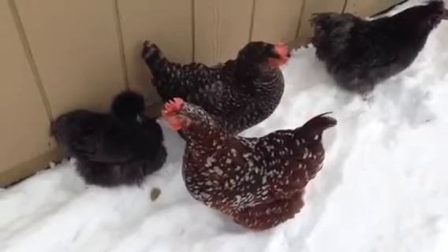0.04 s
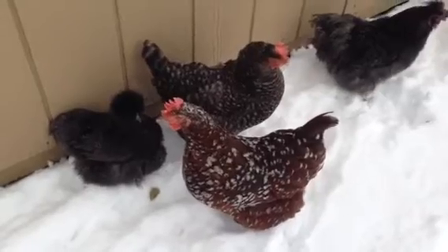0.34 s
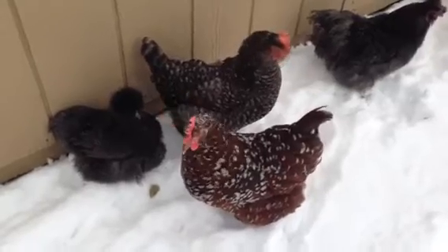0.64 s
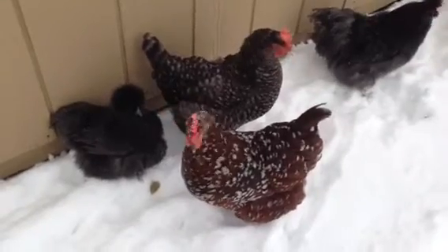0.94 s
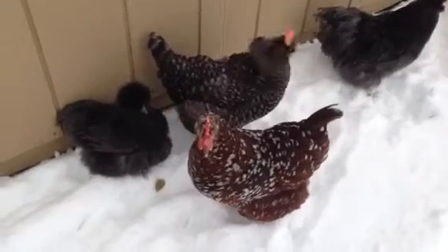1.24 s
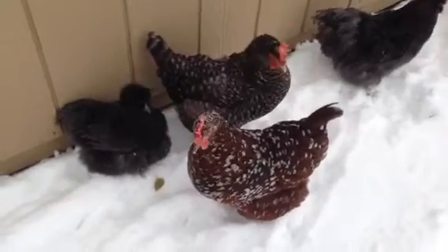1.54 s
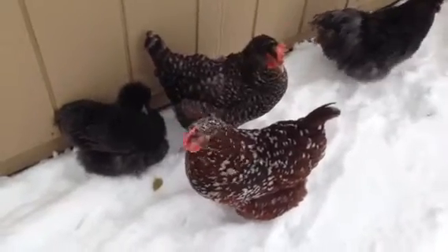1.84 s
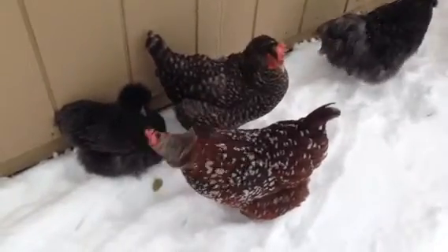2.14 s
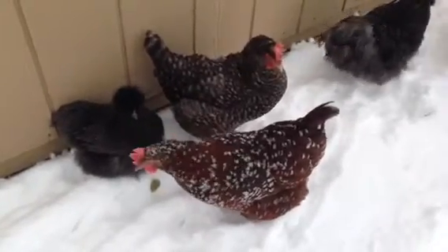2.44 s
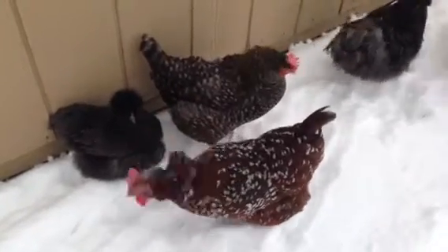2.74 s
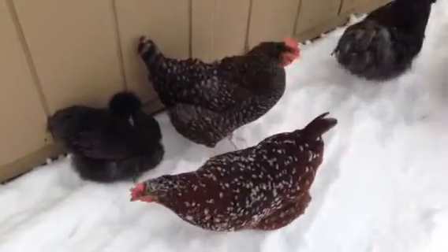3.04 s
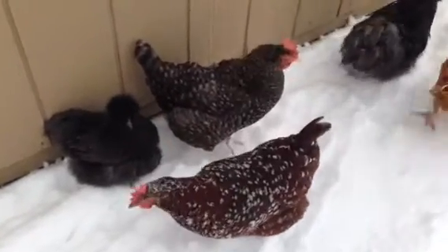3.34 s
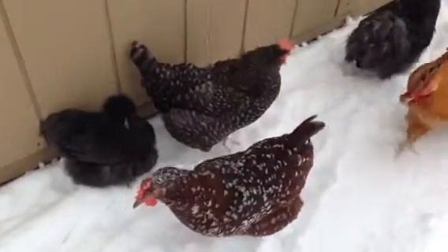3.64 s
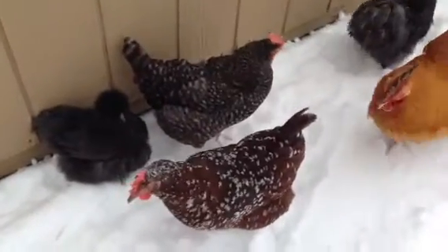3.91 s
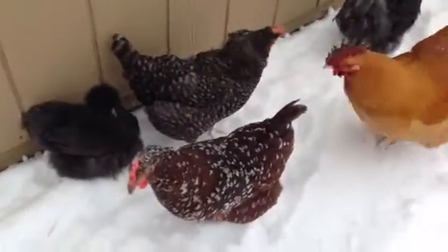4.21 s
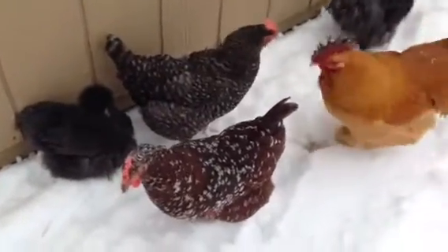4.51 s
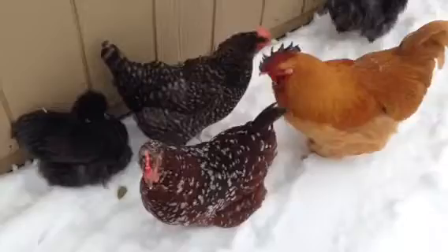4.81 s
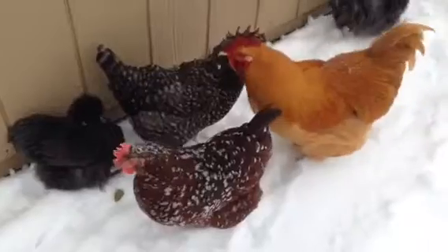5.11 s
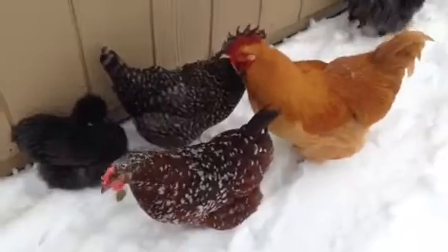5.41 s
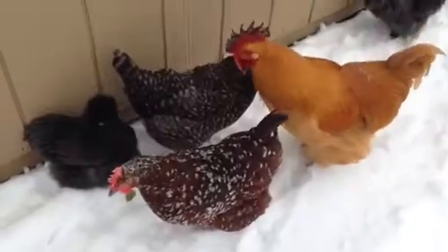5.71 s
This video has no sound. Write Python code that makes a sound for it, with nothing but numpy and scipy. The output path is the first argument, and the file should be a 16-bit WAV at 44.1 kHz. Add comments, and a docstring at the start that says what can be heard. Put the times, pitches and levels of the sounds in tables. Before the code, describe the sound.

A hen clucks, moans creakily and breaks into high rasping whines, twice over, close by in a quiet outdoor yard.

```python
"""A snowy yard by a shed wall, chickens close to the microphone. Twice a hen clucks, moans low and creaky,
then breaks into a high rasping whine with short squawks after it. Her voice is syrinx pulses and breath
shaped by throat and beak; membranes slapping shut make the rattle. Another bird murmurs, the flock
whistles thinly, a small bird chips and beaks tick. A hollow rush swells in the quiet air and a puff of
wind bumps the microphone."""
import sys
import numpy as np
from scipy import signal
from scipy.fft import rfft, irfft, next_fast_len
from scipy.io import wavfile
from scipy.ndimage import uniform_filter1d

SR = 44100
rng = np.random.default_rng(int(sys.argv[2]) if len(sys.argv) > 2 else 0)


def generate_wav(sig):
    """Save sig (samples, or channels by samples) to the path in sys.argv[1] as 16-bit PCM at SR."""
    pcm = np.round(np.clip(np.atleast_2d(sig).T, -1, 1) * 32767).astype(np.int16)
    wavfile.write(sys.argv[1], SR, pcm)


N = 258426
T = np.arange(N) / SR

# Upper resonances of windpipe and beak in moans and murmurs. Each row: frequency in Hz, gain in dB.
LOW_VOICE_EDGE = [(2000, -4), (2400, -3), (2850, -14.5), (3300, -10), (3620, 1), (4000, -18), (4600, -13.5),
                  (5400, -25), (6400, -18.5), (7400, -28), (8700, -25), (14000, -57)]


def undb(db):
    """Decibels to gain."""
    return 10 ** (np.asarray(db) / 20)


def unit(x):
    """Scale to rms 1."""
    return x / np.sqrt(np.mean(x ** 2) + 1e-18)


def steady(x, size=480):
    """Hold the short-term rms at 1."""
    power = uniform_filter1d(uniform_filter1d(x ** 2, size), size)
    return x / np.sqrt(np.abs(power) + 1e-12)


def band(x, lo_hz, hi_hz, order=2):
    """Zero-phase band-pass."""
    sos = signal.butter(order, [lo_hz, hi_hz], "band", fs=SR, output="sos")
    return signal.sosfiltfilt(sos, x)


def colour(x, points, size=2048):
    """Minimum-phase filter through (Hz, dB) points."""
    hz, db = np.transpose(points)
    grid_hz = np.maximum(np.arange(size // 2 + 1) * SR / size, 1)
    cepstrum = irfft(np.log(undb(np.interp(np.log(grid_hz), np.log(hz), db))))
    cepstrum[1:size // 2] *= 2
    cepstrum[size // 2 + 1:] = 0
    return signal.fftconvolve(x, irfft(np.exp(rfft(cepstrum))))[:len(x)]


def wobble(n, lo_hz, hi_hz):
    """Random motion of rms 1 between two rates."""
    size = next_fast_len(n)
    hz = np.arange(size // 2 + 1) * SR / size + 1e-3
    spectrum = rfft(rng.standard_normal(size)) / (1 + (hz / hi_hz) ** 4) / (1 + (lo_hz / hz) ** 4)
    return unit(irfft(spectrum, size))[:n]


def gate(t, start, end, edge_s):
    """Soft-edged window from start to end."""
    return np.sin(np.pi / 2 * np.clip(np.minimum(t - start, end - t) / edge_s + .5, 0, 1)) ** 2


def ramp(t, start, end):
    """Progress from 0 to 1."""
    return np.clip((t - start) / (end - start), 0, 1)


def burst(t, half_s):
    """Flat-topped bump of height 1 around time 0."""
    return np.exp(-np.square(np.square(t / half_s)))


def around(start, end):
    """Sample mask of a call, with a margin."""
    return (T > start - .03) & (T < end + .03)


def place(x, start):
    """Put a short sound on the timeline."""
    return np.interp(T - start, T[:len(x)], x, 0, 0)


def phase_of(hz):
    """Running phase in radians."""
    return 2 * np.pi * np.cumsum(hz) / SR


def pulses(phase, harmonics):
    """One sharp pulse a cycle: equal harmonics summed in closed form."""
    return (np.sin((harmonics + .5) * phase) / (2 * np.sin(phase / 2)) - .5) / np.sqrt(harmonics / 2)


def yard(air_db=-65):
    """Quiet outdoor air and a hollow rush that swells between the calls."""
    # Each row: frequency in Hz, gain in dB.
    air_shape = [(15, -51.5), (25, -6.5), (90, -6), (879, -23), (1910, -20.5), (2130, -19), (2370, -21.5),
                 (3930, -23), (15000, -25.5)]
    rush_shape = [(100, -32.5), (220, -4), (330, -4.5), (480, 0), (640, -0.5), (850, -13), (1300, -13),
                  (1700, -19), (2400, -44.5), (3300, -22.5), (4500, -30.5), (9000, -46)]
    # Each row: time in seconds, level in dB.
    rush_levels = [(0, -73), (1.7, -68), (2.05, -58), (2.5, -57.5), (2.7, -57.5), (2.88, -53.5), (3.1, -57),
                   (3.33, -58.5), (3.42, -59.5), (3.8, -55.5), (5.86, -72)]
    air = unit(colour(rng.standard_normal(N), air_shape, size=8192))
    rush = unit(colour(rng.standard_normal(N), rush_shape))
    rush_db = np.interp(T, *np.transpose(rush_levels)) + 0.53 * wobble(N, 1.6, 22)
    return air * undb(air_db) + rush * undb(rush_db)


def wind():
    """Gusts of low eddies at the microphone, with a few soft bumps."""
    # Each row: frequency in Hz, gain in dB.
    eddy_shape = [(25, -32), (42, -6), (62, 7), (100, 3.5), (170, -4.5), (280, -22), (450, -28), (900, -33),
                  (3000, -54)]
    # Each row: centre in seconds, half length in seconds, level in dB.
    gusts = [(5.22, 0.12, -59), (5.337, 0.021, -46.5), (5.385, 0.018, -41.5), (5.509, 0.09, -40),
             (5.769, 0.035, -54)]
    # Each row: centre in seconds, frequency in Hz, peak in dB.
    bumps = [(3.198, 146, -51.5), (4.559, 82.5, -48.5), (5.337, 164, -36.5), (5.467, 244, -28.5),
             (5.512, 176, -33), (5.558, 185, -34.5)]
    strength = sum(undb(db) * np.exp(-np.abs((T - s) / half_s) ** 3) for s, half_s, db in gusts)
    eddies = unit(colour(rng.standard_normal(N), eddy_shape, size=8192))
    out = steady(eddies, size=1800) * strength
    for s, hz, peak_db in bumps:
        cycles = (T - s) * hz
        out -= undb(peak_db) * np.cos(2 * np.pi * cycles) * np.exp(-(cycles / 0.53) ** 2)
    return out


def chips(high_hz=8700, low_hz=7400, glide_s=0.0087):
    """A small bird's chips: a high tone slides down and levels off."""
    # Each row: start in seconds, peak in dB.
    notes = [(0.707, -63.5), (2.885, -66), (3.705, -65.5)]
    t = T[:SR // 20]
    hz = low_hz + (high_hz - low_hz) * np.exp(-t / glide_s)
    chip = np.sin(phase_of(hz)) * gate(t, 0.0012, 0.027, edge_s=0.0075)
    return sum(undb(db) * place(chip, start) for start, db in notes)


def ticks(decay_s=0.0017):
    """Beak ticks and snow crunches: tiny dry bursts of noise."""
    # Each row: start in seconds, peak in dB.
    contacts = [(1.798, -45), (2.282, -39), (2.795, -43.5), (2.852, -39), (2.899, -43.5), (3.526, -52.5),
                (4.56, -55)]
    # Each row: frequency in Hz, gain in dB.
    shape = [(200, -20), (1200, -10.5), (2400, -17.5), (3600, -19.5), (5500, -15.5), (8000, -25),
             (14000, -25)]
    t = T[:SR // 40]
    out = np.zeros(N)
    for start, db in contacts:
        tick = colour(rng.standard_normal(len(t)) * np.exp(-t / decay_s), shape)
        out += undb(db) * place(tick / np.abs(tick).max(), start)
    return out


def whistles(fade_db=-3.5):
    """Thin, wavering tones glide, swell and fade: mostly the flock's, with a short high one from the hen at
    4.84 s."""
    # Each row: start and end in seconds, first and last pitch in Hz, top level in dB, its place 0-1.
    notes = [(1.757, 1.798, 1074, 1130, -51, .15), (2.6, 3.368, 545, 431.4, -60, 0.54),
             (3.401, 3.483, 800, 493, -56, 1), (3.524, 3.608, 830, 487, -55.5, .8),
             (3.673, 3.694, 539, 570, -52, 0.4), (3.717, 3.738, 606, 590, -49, 0.4),
             (4.839, 4.854, 1006, 1050, -36.5, 0.6)]
    out, waver = np.zeros(N), wobble(N, 24, 150)
    for start, end, first_hz, last_hz, db, peak_at in notes:
        span = around(start, end)
        progress = ramp(T[span], start, end)
        hz = first_hz * (last_hz / first_hz) ** progress * (1 + .028 * waver[span])
        swell = undb(db + np.interp(progress, [0, np.clip(peak_at, .01, .99), 1], [fade_db, 0, fade_db]))
        out[span] += np.sqrt(2) * np.sin(phase_of(hz)) * swell * gate(T[span], start, end, .004)
    return out


def voice(calls, throat, edge_shape, jitter, shimmer, air, hiss, loose, edge_trim_db, waver, harmonics):
    """Syrinx pulses through the throat, alternately strong and weak; a second membrane beats on them."""
    out = np.zeros(N)
    shake, grit = wobble(N, 30, 260), wobble(N, 110, 620)
    tremor, drift = wobble(N, 18.1, 51), wobble(N, 1.28, 29)
    beak_hz, edge_hz = 820, 2250
    for start, end, hz, body_db, beak_db, edge_db, beat, rough in calls:
        span = around(start, end)
        t = T[span]
        phase = phase_of(hz * (1 + jitter * rough * shake[span] + waver * (rough + 0.35) * tremor[span]))
        membrane = np.cos(phase_of(hz * 0.66 * (1 + 0.049 * drift[span])))
        alternation = beat * np.cos(phase / 2 + 0.91)
        rasp = rough * (loose * membrane + shimmer * grit[span])
        flow = pulses(phase, harmonics)
        # Air escapes once a cycle.
        puffs = rng.standard_normal(len(t)) * (1 + np.cos(phase)) * (rough + .025)
        tone = colour((flow + air * puffs) * (1 + alternation + rasp), throat)
        # Sharp closure comes mostly on the strong cycles.
        buzz = colour((flow + hiss * puffs) * (1 + 2.6 * alternation + rasp), edge_shape)
        body = steady(band(tone, 120, beak_hz, order=6))
        # The open beak lets out the second resonance and the bright edge above it.
        beak = undb(beak_db) * steady(band(tone, beak_hz, edge_hz, order=5))
        edge = undb(edge_db + edge_trim_db) * steady(band(buzz, edge_hz, 15000, order=4))
        envelope = undb(body_db + 2.2 * rough * tremor[span]) * gate(t, start, end, .006)
        out[span] += (body + beak + edge) * envelope
    return out


def murmurs(beak_db=-15, edge_db=-25.5, beat=.07, rough=0.33):
    """Another bird's soft closed-beak notes, each gliding a little."""
    # Each row: start and end in seconds, first and last pitch in Hz, body level in dB.
    notes = [(5.219, 5.242, 350, 299, -44.5), (5.323, 5.343, 352.4, 319, -47),
             (5.428, 5.457, 353, 363, -48.5), (5.489, 5.522, 326, 303, -56.5),
             (5.529, 5.569, 323.4, 307, -55), (5.594, 5.83, 317, 304, -59.5)]
    # Each row: frequency in Hz, gain in dB.
    throat = [(100, -37), (320, -13), (650, 0), (950, -9.5), (1300, -12), (2000, -9.5)]
    calls = []
    for start, end, first_hz, last_hz, db in notes:
        hz = first_hz + (last_hz - first_hz) * ramp(T[around(start, end)], start, end)
        calls.append((start, end, hz, db, beak_db, edge_db, beat, rough))
    return voice(calls, throat, LOW_VOICE_EDGE, jitter=0.056, shimmer=0.6, air=0.73, hiss=6.8,
                 loose=0.23, edge_trim_db=1.0, waver=0.029, harmonics=24)


def clucks():
    """The hen's clucks: a handful of uneven, breathy pulses through the throat."""
    # Each row: start, length and rise in seconds, first and last pitch in Hz, level and fade in dB.
    notes = [(0.478, 0.029, 0.013, 201.6, 203.5, -30.5, 13.5), (0.631, 0.026, 0.0036, 231.4, 217, -36, 7),
             (3.605, .064, 0.0047, 207.2, 169.6, -31.5, 27), (4.965, 0.028, .001, 262, 232.6, -50, -5.5)]
    # Each row: frequency in Hz, gain in dB.
    throat = [(90, -18), (190, 2), (300, -11), (470, -10.5), (620, 3.5), (760, 5), (1020, -10.5),
              (1300, 0.5), (1580, -12), (1850, -11), (2300, -23), (3500, -20), (4800, -38), (12000, -49)]
    out = np.zeros(N)
    t = T[:SR // 8]
    for start, length_s, rise_s, first_hz, last_hz, db, fade_db in notes:
        hz = np.interp(t, [0, length_s], [first_hz, last_hz]) * (1 + .018 * wobble(len(t), 30, 200))
        phase = phase_of(hz) - np.pi / 2
        flow = pulses(phase, harmonics=50) + rng.standard_normal(len(t)) * (1 + np.cos(phase))
        effort = np.minimum(t / rise_s, 1) * undb(-fade_db * t / length_s) * gate(t, -1, length_s, 0.012)
        cluck = colour(flow * effort, throat) / np.std(colour(flow, throat))
        out += undb(db) * place(cluck, start)
    return out


def moans(closing_db=6, beat=0.14):
    """The hen's low register: each glide starts creaky and clears as the beak closes."""
    # Each row: start and end in seconds, first and last pitch in Hz, body level, swell, beak resonance
    # and bright edge in dB, roughness 0-1, clearing time in seconds.
    notes = [(0.664, 0.732, 239, 245.4, -49, -1, -8.5, -38, 0.43, 0.087),
             (0.729, 1.084, 253.6, 327.3, -41, 7.5, -6, -23, 0.54, 0.14),
             (1.804, 1.834, 298.3, 329, -37, 7, -3, -20, 0.6, .1),
             (2.294, 2.332, 335, 344.6, -43, 8, 5, -20, 0.88, .1),
             (3.755, 3.818, 229.8, 202, -43.5, -6, -4, -23, 0.56, .2),
             (3.826, 3.883, 204.3, 215.3, -44, 12, -1.5, -22, 0.62, .2),
             (3.886, 4.054, 285.4, 318, -40.5, 4, -5.5, -25, 0.56, 0.086)]
    # Each row: frequency in Hz, gain in dB.
    throat = [(100, -35.5), (200, 0.5), (310, 1.5), (420, -2.5), (620, 12), (760, 6), (930, -13), (1080, 2),
              (1240, -0.5), (1480, -18.5), (1780, -11.5), (2150, -40.5)]
    calls = []
    for start, end, first_hz, last_hz, db, swell_db, beak_db, edge_db, rough, clear_s in notes:
        t = T[around(start, end)]
        progress = ramp(t, start, end)
        hz = first_hz + (last_hz - first_hz) * progress
        body_db = db + swell_db * (progress - .5)
        open_db = beak_db - closing_db * (progress - .5)
        creak = rough / (1 + ((t - start) / clear_s) ** 4)
        calls.append((start, end, hz, body_db, open_db, edge_db, beat * creak, creak))
    return voice(calls, throat, LOW_VOICE_EDGE, jitter=0.084, shimmer=0.5, air=0.66, hiss=5.7,
                 loose=0.079, edge_trim_db=2.5, waver=0.026, harmonics=44)


def slaps(t, start, rattle_db, first_s=0.0445, gap_s=.034, lead_s=0.0082):
    """Membranes slap shut unevenly: strength in dB over time, and the same curve lead_s earlier."""
    # Each row: time in seconds, strength in dB.
    hard_slaps = [(1.133, 12.5), (1.333, 11), (1.357, 16), (1.433, 15), (1.486, 11), (1.57, 10),
                  (1.845, 14), (4.135, 11.5), (4.201, 12.5), (4.281, 13.5), (4.302, 13), (4.444, 12),
                  (4.805, 14), (5.002, 12.5), (5.087, 10.5)]
    gap_noise, strength_noise = rng.standard_normal((40, 2)).T
    gaps_s = gap_s * np.exp(0.208 * gap_noise)
    times_s = start + first_s + np.cumsum(gaps_s) - gaps_s[0]
    train = np.column_stack([times_s, rattle_db * (1 + 0.23 * strength_noise)])
    when, db = np.vstack([train, hard_slaps]).T[:, :, None]
    return [np.max(db * burst(t + shift - when, half_s=0.0069), axis=0) for shift in (0, lead_s)]


def whine_curves(start, end, first_hz, last_hz, db, swell_db, beak_db, opening_db, bright_db,
                 rough, beat, accent_db, rattle_db, close_s, flip):
    """A whine breaks in, catches, rattles as effort moves pitch and level, and flips up at the close."""
    t = T[around(start, end)]
    effort = 1 / (1 + np.exp((.48 - ramp(t, start, end)) / .11))
    push = effort - .5
    strain = 1 - 0.58 * push  # smoother as effort grows
    break_db = accent_db * burst(t - start, half_s=0.01714)
    catch_db = accent_db * burst(t - start - 0.023, half_s=0.0066)
    closing = ramp(t, end - close_s, end)
    lift = flip * np.minimum(2 * closing, 1)
    slap_db, early_db = ((1 - closing) * train for train in slaps(t, start, rattle_db))
    # The tone surges before each slap, then dips and sags in pitch; this throb settles with time.
    throb = 0.2 + 0.8 * burst(t - start, half_s=0.503)
    swing_db = slap_db - slap_db.mean()
    throb_db = throb * (0.46 * (early_db - early_db.mean()) - 0.21 * swing_db)
    overshoot, sag = 0.00476 * break_db, 0.00444 * throb * swing_db
    hz = (first_hz + (last_hz - first_hz) * effort) * (1 + overshoot + lift - sag)
    body_db = db + swell_db * push + break_db - catch_db - 6.5 * closing + 0.43 * throb_db
    # The beak flares at the break and shuts with the flip.
    open_db = beak_db + opening_db * push + 0.34 * break_db - 130 * lift + 0.57 * throb_db
    edge_db = bright_db + strain * slap_db + 6.5 * push - break_db
    return start, end, hz, body_db, open_db, edge_db, beat, rough * strain


def whines():
    """The hen's high register: reedy whines and squawks with little jitter or breath."""
    # Each row: start and end in seconds, first and last pitch in Hz, body level, swell, beak resonance,
    # its opening and bright edge in dB, roughness and half-pitch beat 0-1, accent and rattle in dB,
    # closing time in seconds, upward flip as a share of the pitch.
    notes = [(1.087, 1.708, 473.9, 516, -40.5, 4.5, 6, 7, -26, 0.26, 0.15, 4, 9.5, 0.069, 0.034),
             (1.833, 1.934, 515, 485.4, -40, -6.5, 6, 0, -25, 0.56, 0, 0.5, 5.5, 0.0071, .01),
             (1.936, 2.031, 503, 522, -37.5, 4.5, 2, -3, -25, 0.13, 0.19, -1, 3, 0.039, 0.11),
             (2.331, 2.378, 460.7, 483, -46, 12, 15, 0, -26, 0.38, 0.15, 1, -10, 0.034, 0.15),
             (4.058, 4.842, 488, 520, -41, 6, 6, 5.5, -24, 0.35, 0.19, 3.5, 7, 0.031, 0.128),
             (4.993, 5.166, 496.3, 534, -38.5, 4.5, 6, 0.5, -27, 0.3, 0.16, 6, 5, 0.033, 0.13)]
    # Resonances of the throat, and of windpipe and beak. Each row: frequency in Hz, gain in dB.
    throat = [(100, -53.5), (250, -15.5), (400, -13), (510, -8.5), (640, -7.5), (780, -2.5), (880, -5.5),
              (1000, 7.5), (1190, 9), (1400, -13), (1490, -20.5), (1570, -17), (1700, -1), (2000, -30)]
    edge_shape = [(2000, -0.5), (2500, -8.5), (3000, -6.5), (3330, 2.5), (3800, -4.5), (4400, -10.5),
                  (5200, -20), (5900, -14.5), (7200, -30), (7900, -10.5), (8600, -33), (9400, -17.5),
                  (10500, -34.5), (15000, -38)]
    calls = [whine_curves(*note) for note in notes]
    return voice(calls, throat, edge_shape, jitter=.018, shimmer=0.25, air=.5, hiss=1.3,
                 loose=0.47, edge_trim_db=1.5, waver=0.029, harmonics=28)


def shed_scatter(x, t60_s=.4, level_db=-36.5):
    """Faint reflections off shed and fence, dying quickly over the snow."""
    t = T[:SR // 2]
    response = band(rng.standard_normal(len(t)), 260, 4300) * undb(-60 * t / t60_s) * (t > .006)
    return undb(level_db) * signal.fftconvolve(x, response / np.linalg.norm(response))[:N]


def scene():
    """The birds, their reflections and the air around them, in mono."""
    birds = moans() + whines() + murmurs() + clucks() + whistles() + ticks()
    return (birds + shed_scatter(birds) + chips() + wind() + yard())[None]


def record(dry):
    """The recorder cuts the top."""
    top_hz = 15350
    return signal.sosfilt(signal.ellip(12, .1, 80, top_hz, fs=SR, output="sos"), dry)


dry = scene()
out = record(dry)
generate_wav(out)
```